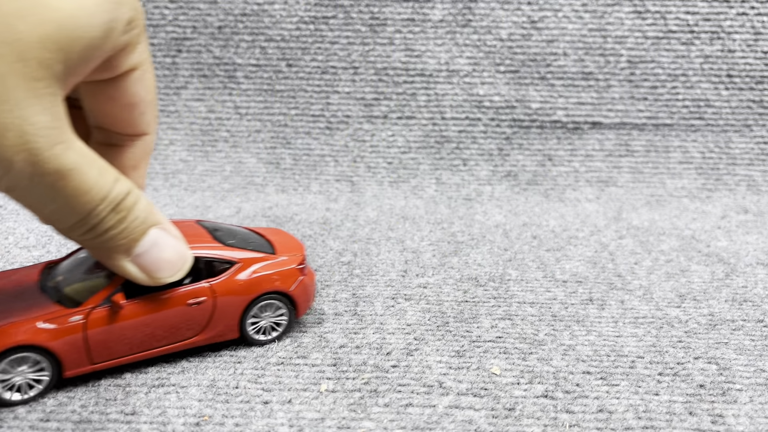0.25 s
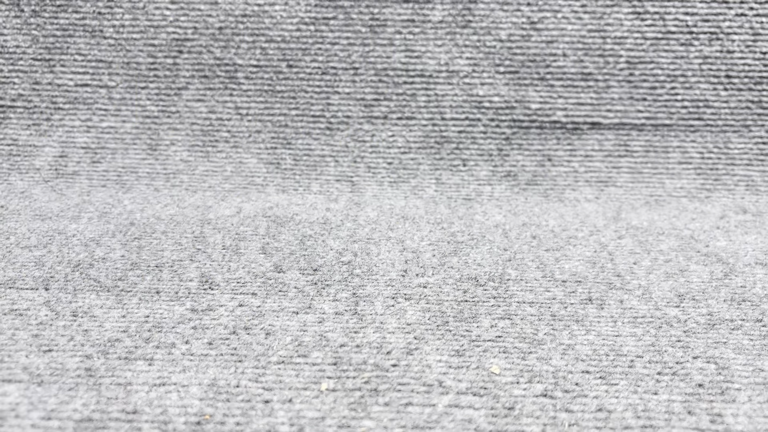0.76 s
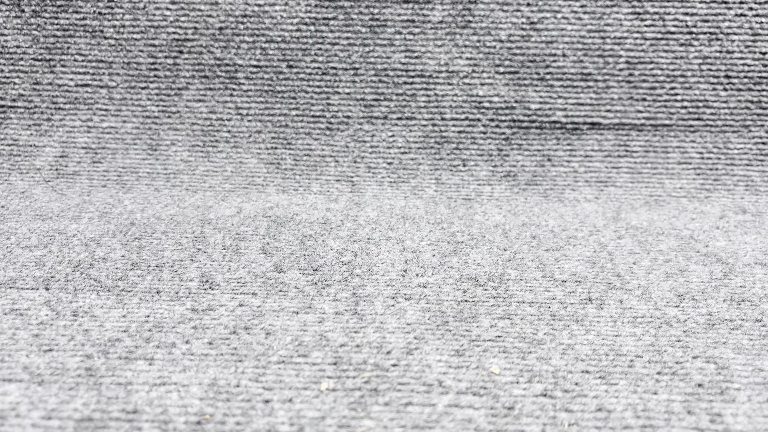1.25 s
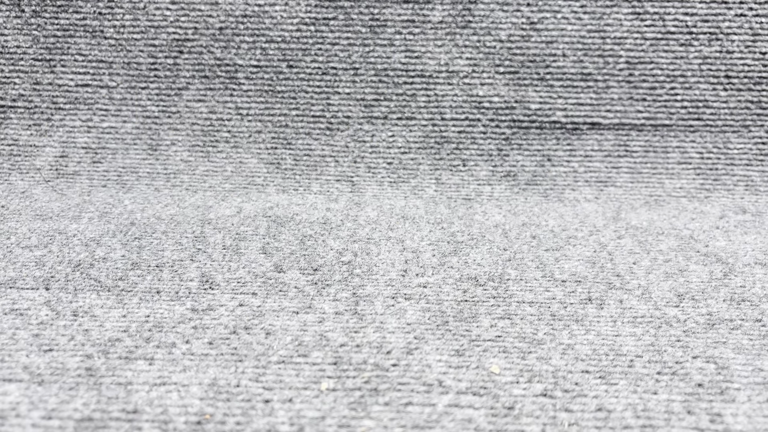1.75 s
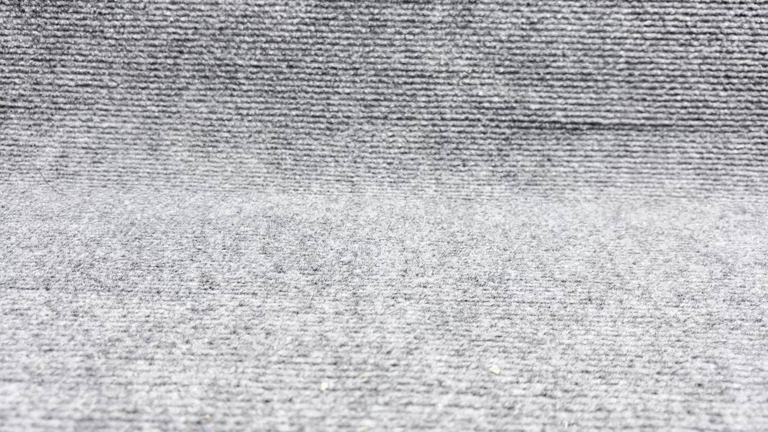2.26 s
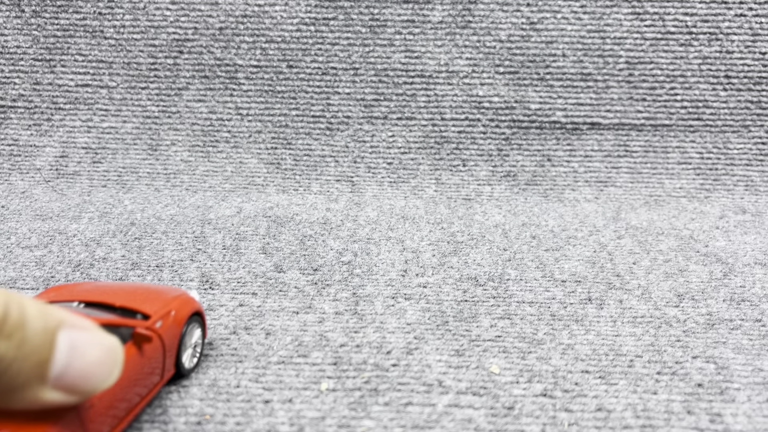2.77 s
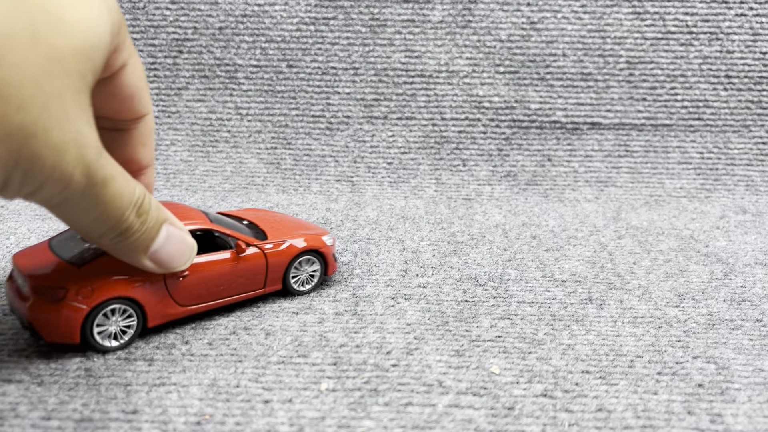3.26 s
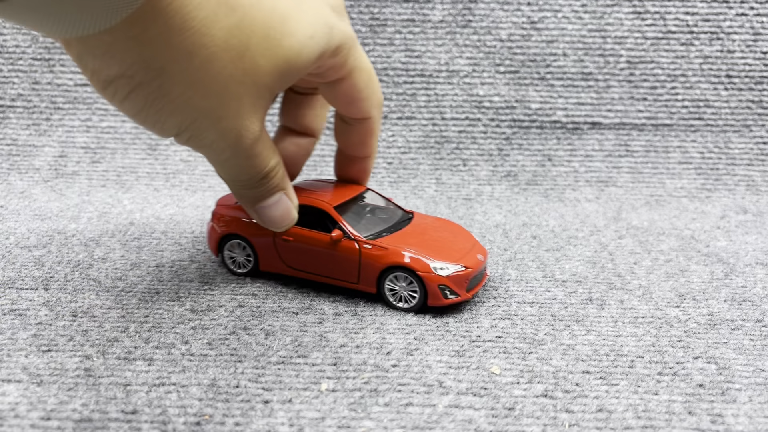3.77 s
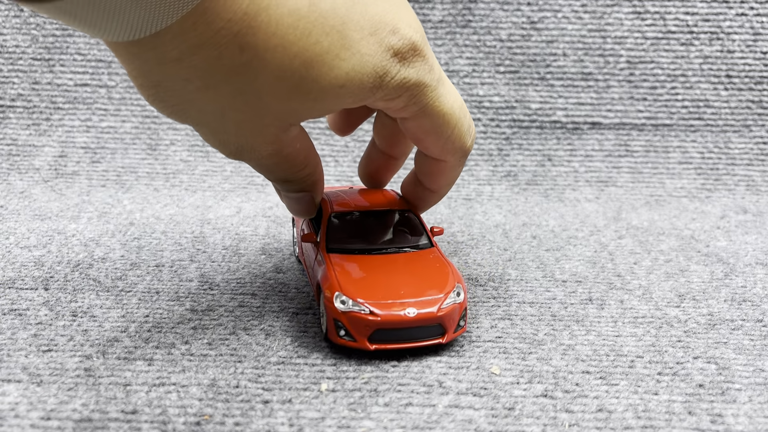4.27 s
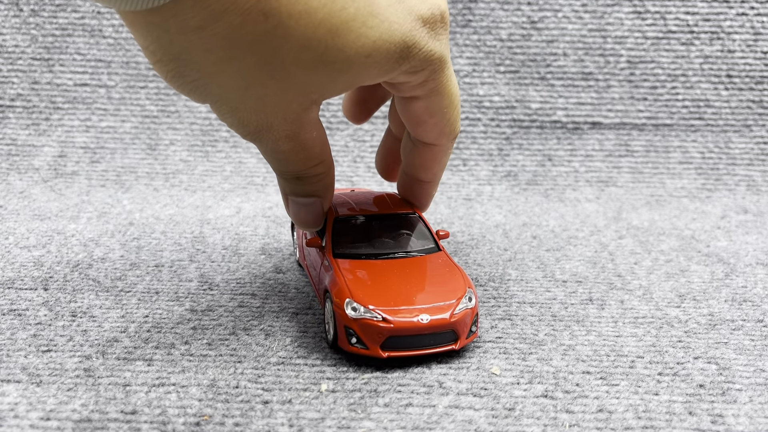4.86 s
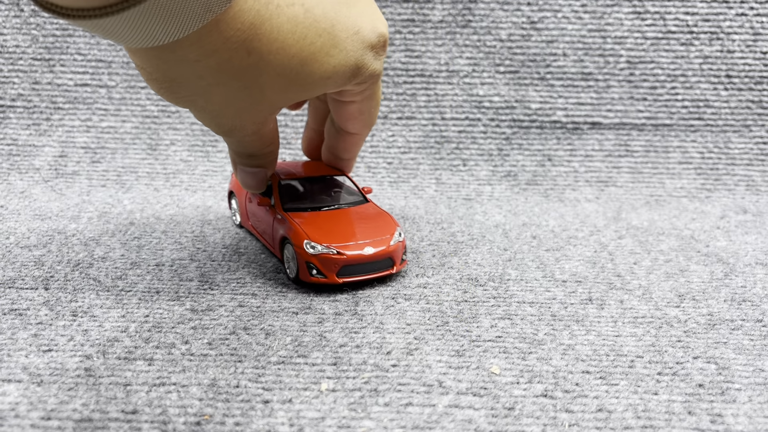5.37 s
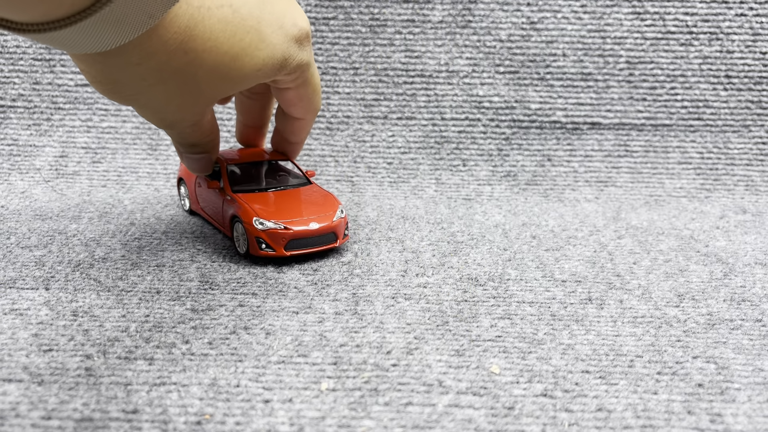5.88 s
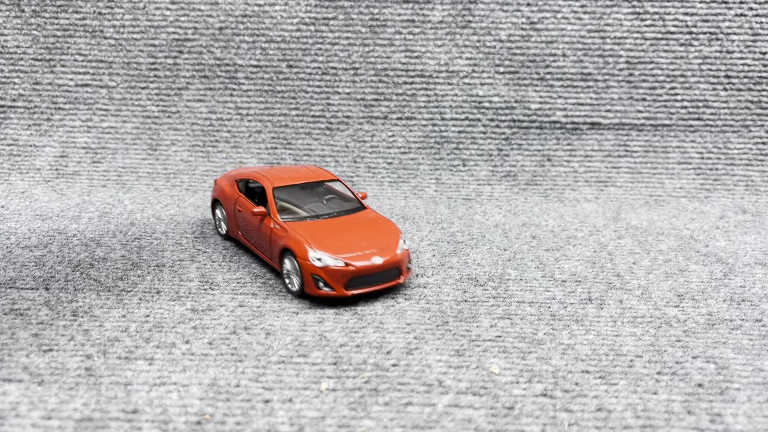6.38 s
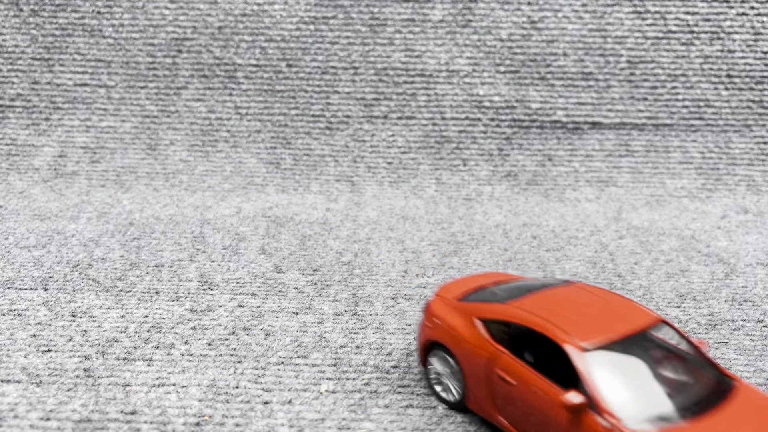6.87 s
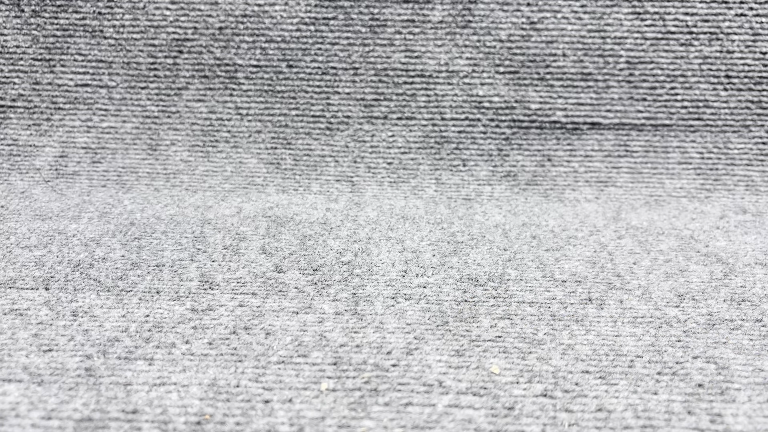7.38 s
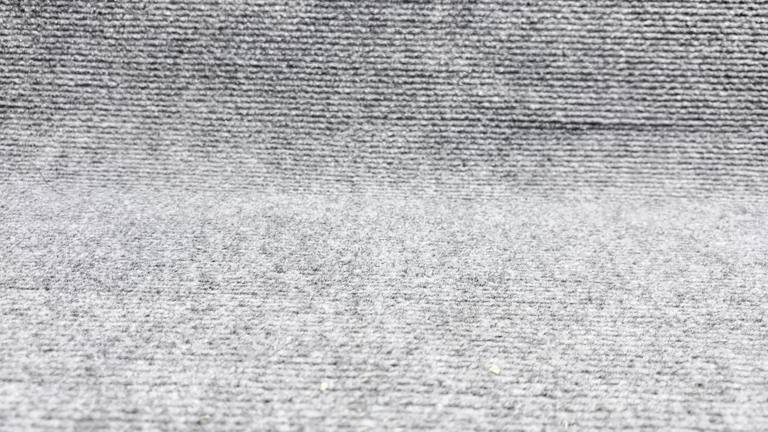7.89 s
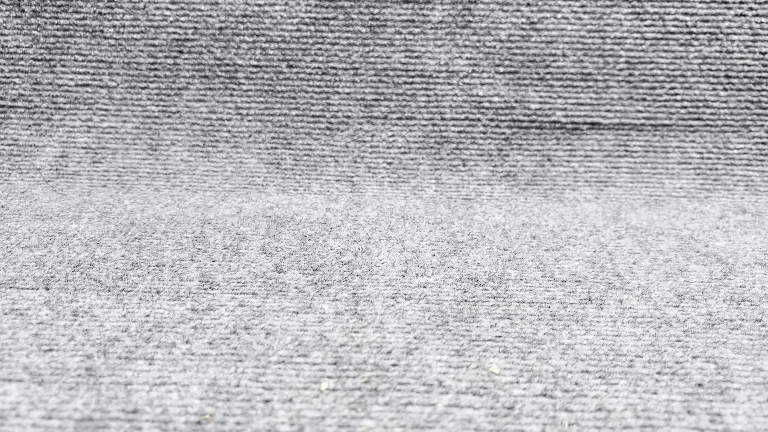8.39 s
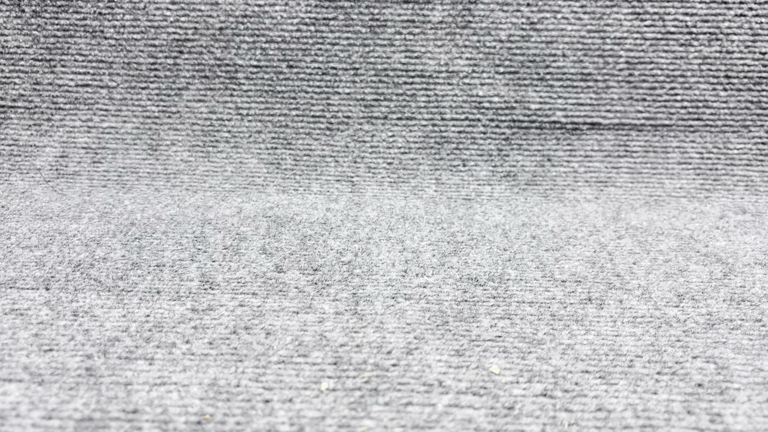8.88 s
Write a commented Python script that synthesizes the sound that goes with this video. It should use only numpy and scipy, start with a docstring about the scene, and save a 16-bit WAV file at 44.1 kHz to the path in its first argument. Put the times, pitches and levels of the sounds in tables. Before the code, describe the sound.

A small toy car is pushed and pulled over carpet by hand, its wind-up ratchet clicking in bursts with plasticky rattles, in a quiet humming room.

```python
"""Clockwork toy car on a carpet

A hand pushes and pulls a small wind-up toy car over a carpet in a quiet room, heard by two close ports.
Ratchet teeth, bumps and loose parts are noise bursts that excite damped modes of body, gearbox and pawl;
grains of rolling contact excite the same modes more softly as rustle, with a low scrape of the pile.
Knocks ring the chassis cavity, and floor boards rumble while the car bears on them.
Shaped noise gives the ventilation, steady sines with narrow noise give a wavering hum."""
import sys
import numpy as np
from scipy import signal
from scipy.fft import rfft, irfft
from scipy.io import wavfile
from scipy.ndimage import uniform_filter1d

SR = 44100
rng = np.random.default_rng(int(sys.argv[2]) if len(sys.argv) > 2 else 0)


def waveform_to_disk(signal):
    """Save audio, clipped to [-1, 1], as 16-bit WAV at the path in sys.argv[1]."""
    frames = np.transpose(np.atleast_2d(signal))
    scaled = np.clip(frames, -1, 1) * 32767
    samples = np.round(scaled).astype(np.int16)
    wavfile.write(sys.argv[1], SR, samples)


N = 403062   # samples

# Ventilation noise spectrum: [f/Hz, relative spectral level/dB]
AIR_SPECTRUM = [(25, -45), (36, -14), (50, -0.5), (117, -7), (163, -4.5), (176, -17), (200, -7.5),
                (213, -7), (257, -12), (290, -15), (310, -14.5), (450, -15.5), (600, -19.5), (880, -25),
                (1100, -32.5), (1600, -37), (2400, -42.5), (3200, -49.5), (4200, -55), (6300, -62),
                (8500, -58), (11500, -57.5), (13000, -62)]
# Share of air noise power common to both ports: [f/Hz, share/1]
AIR_LIKENESS = [(60, 1), (130, 0.95), (280, 0.67), (590, 0), (1280, 0), (2740, 0), (5900, 0.2), (12600, .9)]
# Fan tones and room resonances: [f/Hz, bandwidth/Hz, level/dB, steady-to-wavering amplitude ratio/1]
HUM_TONES = [(65.87, 1.64, -49, 2.3), (100, 2.7, -53.5, 1.5), (139.4, 21, -53.5, 0.046),
             (191.6, 11, -51.5, 1.72), (225.1, 5.6, -62, 0.073), (238.5, 11, -62.5, 0.14),
             (270.8, 20.8, -59.5, 0.16), (334.3, 14, -69.5, 0.23)]
# Phase lead of the left port over the right: [f/Hz, phase/rad]
PORT_PHASE = [(300, 0), (1400, 1), (1900, 1.09), (2700, 1.42), (3300, 1.27), (4300, 0.85), (5500, 1.1),
              (6700, -0.4), (7600, 1.7), (8870, -1), (9400, -1.9), (10400, -3.5), (11700, -6),
              (12800, -4.5)]
# Level of the left port minus the right: [f/Hz, level difference/dB]
PORT_LEVEL = [(60, 1), (110, -1.5), (200, 4), (360, 6), (650, -5), (1170, 0.5), (2120, -3.5), (3850, -1.5),
              (6970, -3.5), (12600, -7.5)]
# Rolling and handling, one list per movement: [t/s, body rustle level/dB, gear rustle level/dB]
MOVEMENTS = [
    [(0, -68.5, -62.5), (.65, -64.5, -64), (.94, -62, -61), (1.05, -59, -59), (1.15, -57.5, -54.5),
     (1.5, -68, -71), (1.9, -55.5, -59.5), (2.14, -60.5, -55.5), (2.46, -65.5, -62.5), (2.93, -64, -65.5),
     (3.12, -57, -55.5), (3.3, -62.5, -60), (3.56, -58.5, -58), (3.8, -63.5, -61.5), (3.98, -62.5, -60),
     (4.09, -58, -55), (4.19, -77, -76), (4.28, -65, -68), (4.35, -84, -83.5)],
    [(4.74, -91, -99), (4.96, -71, -89), (5.05, -58.5, -68), (5.16, -62, -53), (5.24, -59, -70),
     (5.31, -60, -66), (5.42, -54.5, -70), (5.5, -49.5, -56), (5.56, -58, -67), (5.64, -58, -58),
     (5.75, -74, -75), (6.29, -75, -78)],
    [(6.29, -71, -80), (6.55, -63.5, -71), (6.75, -49, -59), (6.89, -58, -65), (7.06, -55.5, -66),
     (7.27, -62, -62), (7.55, -71.5, -83)],
    [(7.95, -70, -82), (8.0, -57.5, -65), (8.1, -52, -53), (8.19, -60.5, -58), (8.28, -53, -46),
     (8.38, -58, -62), (8.48, -67, -76), (8.55, -60, -59), (8.64, -59.5, -58), (8.75, -58, -68),
     (8.99, -66.5, -65), (9.14, -57, -62)],
]
# Modes of each part before damping by fingers and pile: [f/Hz, relative level/dB, free t60/s]
BODY_MODES = [(1530, -10, 0.0075), (1770, -13.5, 0.013), (1906, 5, 0.017), (2055, 5, 0.029),
              (2262, 10.5, 0.0094), (2474, 4, 0.026), (2650, 1, 0.024), (2852, -0.5, 0.029),
              (3030, 0, 0.019), (3275, -12, 0.033)]
GEAR_MODES = [(3390, 4.5, 0.005), (4007, -5.5, 0.02), (4290, 3, 0.0034), (4937, -5, 0.015),
              (5207, -8, 0.015), (5790, 3, 0.0081), (5950, 7, 0.0027), (6540, -1.5, 0.012)]
PAWL_MODES = [(6960, 4.5, 0.0025), (7290, -1, 0.013), (7980, 5.5, 0.0041), (8890, -2, 0.017),
              (9420, 4.5, 0.0069), (10090, 7.5, 0.0098), (10550, 5.5, 0.0046), (11000, 5, 0.0078),
              (11900, -14, 0.01), (13800, -30, 0.0025)]
# The hand turns and cups the car, so other modes face the ports: [t/s, favoured body f/Hz,
# favoured gearbox f/Hz, level of lower gearbox modes/dB, level of highest modes/dB]
ORIENTATION = [(0.0, 2190, 4840, 5, -9), (0.35, 2560, 4100, -2, -5), (0.56, 2300, 5740, -1, 1),
               (1.55, 2140, 4260, 1, 0), (1.65, 2260, 6400, 13.5, 6), (1.78, 2100, 3670, 2, 2),
               (2.01, 2040, 4740, 3, 2), (2.37, 2800, 5080, -1, 5), (3.0, 2130, 4130, -5.5, -3),
               (3.05, 2360, 5840, 10, -8), (3.36, 2580, 4500, 0, -4), (3.59, 2360, 6560, 9.5, -3),
               (3.66, 2260, 4380, 2, -5), (3.84, 2320, 5100, -1, -2.5), (4.74, 2360, 3530, -1, -3),
               (5.42, 2580, 6750, 3, 5.5), (5.78, 2090, 3420, -8, -8), (5.9, 2300, 5000, -3, -2),
               (6.5, 2320, 3900, -9, 2), (7.13, 2040, 3620, -10, 10), (7.15, 2350, 5100, -3, -3),
               (7.53, 2200, 4900, -8, -4), (7.64, 1870, 3720, -4, 0), (8.06, 1780, 4300, 2, -1),
               (8.3, 2640, 4330, 6, -3), (8.55, 2220, 3730, 2, -1), (8.68, 2250, 4130, 1, -0.5),
               (8.86, 2240, 4300, 1, 0), (8.91, 2360, 4940, 11.5, -2), (9.04, 2340, 3440, 2, -6),
               (9.14, 2500, 5050, -4, -7)]
# Sideways place of the car, before the port differences: [t/s, left minus right level/dB]
PLACE = [(0, 7.5), (3, 7), (5.8, 7.5), (6.5, 8), (7, 3.5), (8, 4), (9.14, 3.5)]
# Ratchet, one list per hand stroke; teeth between rows fall evenly:
# [t/s, tooth count/1, body level/dB, pawl level/dB]
RATCHET_STROKES = [
    [(.0165, 0, -50.5, -51.5), (.1707, 3, -49.5, -41.5), (.3576, 7, -49.5, -49.5), (.565, 12, -48.5, -45),
     (.7266, 16, -48.5, -48.5), (.8107, 18, -48, -49), (.8899, 20, -48.5, -46), (1.0658, 25, -50, -47),
     (1.0958, 26, -50, -44.5), (1.1347, 27, -42, -46), (1.2412, 29, -54, -50), (1.3178, 30, -49.5, -47.5)],
    [(1.9472, 0, -58, -51.5), (1.9941, 1, -46.5, -42.5), (2.0988, 3, -47, -45.5), (2.1996, 5, -46.5, -43.5),
     (2.2453, 6, -48, -42.5), (2.2864, 7, -45.5, -43), (2.367, 9, -46, -40.5), (2.496, 12, -42, -42.5),
     (2.589, 14, -43.5, -41), (2.7475, 17, -42.5, -44), (2.8436, 19, -49, -45.5), (2.894, 20, -45, -45),
     (3.0968, 24, -49.5, -51), (3.1522, 25, -44.5, -42.5), (3.3032, 27, -52, -50), (3.3712, 28, -50, -46.5),
     (3.4354, 29, -48, -49), (3.4969, 30, -57, -48), (3.5686, 31, -49, -51), (3.6816, 33, -52.5, -52),
     (3.8153, 35, -53, -52.5), (3.8613, 36, -43.5, -49), (3.9358, 37, -50, -46)],
    [(5.1287, 0, -46.5, -44.5), (5.1495, 1, -42, -41.5), (5.1793, 3, -45.5, -45.5), (5.1995, 4, -46, -41),
     (5.227, 5, -43.5, -41.5), (5.283, 8, -49.5, -49), (5.302, 9, -44, -38.5), (5.329, 10, -39, -37.5),
     (5.3823, 12, -47, -45), (5.4234, 14, -57, -42), (5.4585, 15, -45, -45), (5.4752, 16, -50, -43.5),
     (5.5018, 17, -47, -46), (5.5159, 18, -41, -50), (5.538, 19, -38.5, -46)],
    [(7.1541, 0, -40, -43.5), (7.1874, 1, -52, -45.5), (7.3322, 4, -44, -49), (7.3965, 5, -45, -45),
     (7.4904, 6, -47, -47.5)],
    [(8.1028, 0, -56, -46), (8.1222, 1, -50, -41), (8.149, 2, -45, -40), (8.2546, 5, -47, -50),
     (8.2865, 6, -42.5, -43), (8.3246, 7, -46, -39), (8.3592, 8, -44, -37)],
]
# Bumps, slips and rattles outside the ratchet beat:
# [t/s, body level/dB, gearbox level/dB, pawl level/dB]
IMPACTS = [(0.2517, -55, -53, -52), (0.5092, -47, -54, -60.5), (0.595, -54, -59.5, -69),
           (0.742, -51, -51, -50), (0.7649, -38, -41, -38), (0.826, -47, -49, -62), (0.879, -62, -51, -61),
           (0.95, -52, -43.5, -58), (1.01, -55, -45, -50), (1.1263, -58, -52, -67),
           (1.2578, -41.5, -66, -53), (1.304, -55, -58, -58), (1.392, -42, -59, -60),
           (1.3978, -36, -51, -59), (1.402, -47, -50, -48), (1.486, -54, -53, -59),
           (1.4944, -31.5, -47, -52), (1.584, -45.5, -52, -41), (1.6112, -46, -63, -62),
           (1.658, -39, -42, -39), (1.6645, -30.5, -37, -29), (1.68, -35.5, -43, -45),
           (1.72, -47, -60, -56.0), (1.727, -38.5, -40, -35.5), (1.775, -43.5, -50, -53),
           (1.842, -46.5, -66, -63), (1.8582, -45, -48.5, -48), (1.8953, -37.5, -50, -63),
           (1.908, -50, -57, -56), (2.125, -56, -58, -56), (2.256, -58, -57, -56), (2.517, -47, -61, -55),
           (2.526, -46, -49, -68), (2.56, -43, -52, -50), (2.601, -45, -64, -63), (2.835, -56, -45.5, -77),
           (2.955, -39.5, -47.5, -49), (2.9867, -50, -64, -59.5), (3.0917, -47, -43.5, -37),
           (3.338, -48, -50, -44), (3.558, -50, -54, -44.5), (4.0304, -48, -64, -67),
           (4.092, -41.5, -57, -51), (4.1015, -62, -53.5, -48.5), (4.153, -48, -58, -56),
           (4.274, -51.5, -80, -76.5), (4.306, -51, -52.5, -56), (4.7287, -45.5, -73, -75),
           (4.735, -42, -60, -68), (4.965, -50, -77, -81), (5.069, -58, -62, -60),
           (5.084, -44.5, -68.5, -62), (5.096, -51, -58, -55), (5.1156, -42.5, -50, -57.5),
           (5.4298, -41, -56, -49), (5.524, -42.5, -46.5, -58), (5.553, -58, -62, -57.5),
           (5.748, -48, -59, -66), (5.779, -47.5, -59, -58.5), (5.819, -48.5, -61, -60),
           (5.832, -48, -61, -75), (5.874, -46.0, -50.5, -54), (5.901, -44.5, -46.5, -43.5),
           (5.915, -48.5, -57, -58), (6.024, -57, -77, -71), (6.04, -56.5, -76, -68),
           (6.149, -55, -67, -81), (6.296, -58.5, -87.0, -70), (6.4297, -56, -79.5, -80),
           (6.463, -43.5, -73, -79), (6.503, -47.5, -72, -77), (6.5697, -51, -67, -59),
           (6.605, -42, -55, -58), (6.6485, -35, -53, -48), (6.654, -33, -40, -41), (6.688, -45, -54, -59),
           (6.7122, -34.5, -48, -54), (6.721, -32.5, -53, -64), (6.728, -43, -52, -60),
           (6.743, -40.5, -57, -59.0), (6.787, -44, -43.5, -54), (6.797, -39, -49.5, -65),
           (6.8055, -44, -56, -70), (6.821, -42, -58.0, -65), (6.828, -48, -53, -63),
           (6.854, -51, -61, -64.5), (6.928, -34, -41, -57), (6.9493, -34, -38, -57),
           (6.9579, -26.0, -34.5, -34.5), (7.002, -41, -47, -63), (7.014, -39.5, -53, -58.0),
           (7.02, -40, -47, -62), (7.085, -46, -57, -53), (7.106, -45, -52, -59), (7.115, -42, -49, -67),
           (7.18, -41.5, -59, -56), (7.205, -47, -69, -60.0), (7.2616, -40.5, -53, -56),
           (7.4413, -49, -62, -71), (7.9447, -47, -49, -51), (7.979, -42.5, -43.5, -43),
           (7.985, -45, -53, -68), (8.019, -50, -56, -65), (8.078, -49, -57.5, -62),
           (8.201, -50.0, -53, -57), (8.2775, -43, -41, -53), (8.308, -53, -49, -52),
           (8.331, -45, -44, -42), (8.355, -41.5, -38.5, -53), (8.519, -64, -53.5, -66),
           (8.6601, -50, -47, -47), (8.6733, -27.5, -37.5, -34), (8.675, -48, -33, -31.5),
           (8.6893, -53, -43, -43), (8.704, -46, -49, -41), (8.716, -46, -45, -43), (8.786, -36, -43, -36),
           (8.7946, -60, -47, -46), (8.868, -43, -36, -29.5), (8.88, -57, -53, -43), (8.899, -52, -51, -49),
           (8.9355, -60.5, -57, -63), (9.019, -59, -57, -68), (9.0534, -61, -56, -61),
           (9.1092, -62, -51.5, -67), (9.131, -51, -53, -53)]
# Hollow knocks of the chassis: [t/s, peak level/dB, f/Hz]
CHASSIS_KNOCKS = [(3.866, -48, 1140), (5.343, -48, 960), (5.472, -42, 620), (6.928, -47, 1330),
                  (6.957, -41, 1150), (8.673, -37, 1110), (8.786, -41, 1030), (8.868, -46, 1460)]
# Floor rumble, one list per bearing of the car on the floor: [t/s, level/dB]
BEARING = [
    [(5.6, -71), (5.776, -35.5), (5.95, -62)],
    [(6.55, -54), (6.772, -38), (7.05, -58)],
    [(8.05, -65), (8.14, -38.5), (8.2, -52), (8.3, -41), (8.398, -44.5), (8.45, -69)],
    [(8.6, -45), (8.698, -38), (8.8, -61)],
]

AIR_DB = -46
ROOM_T60_S, ROOM_DB = 0.42, -18.5
CUTOFF_HZ, TOP_HZ = 13240, 11700   # upper limit of all sound; low-pass edge for air and pawl rustle
CLICK_DAMPING, RUSTLE_DAMPING = 0.8, 0.36   # factors on t60: fingers and pile shorten the ringing
SHAKE_DB, SHAKE_T60_S = -21.5, 0.27   # a bump leaves the loose parts rustling
TOOTH_SCATTER_DB = 0.85   # no two teeth strike alike
TOOTH_GEAR_DB, RATTLE_GEAR_DB = -2, 2   # gearbox level relative to pawl level
RATTLE_COUNT = 220
RATTLE_BODY_DB, RATTLE_PAWL_DB, RATTLE_SCATTER_DB = 2.5, -4.5, 0.5   # relative to the rustle of the moment
FAVOUR_DB, FAVOUR_OCTAVES = 9, 0.31   # lift near a favoured pitch and its width
GEARBOX_HZ, HIGHEST_HZ = (3350, 4980), 10400   # lower gearbox modes; start of the highest modes
REBOUND_S = (0.0016, 0.0115)   # range of delay of the second strike
REBOUND_DB, REBOUND_SCATTER_DB = -17.5, 6.5
BOARD_HZ, BOARD_T60_S = (94.6, 75, 73, 57), 0.062   # boards under each bearing
SCRAPE_HZ, SCRAPE_DB = (560, 1680), -6.5   # band; level relative to body rustle


def from_db(db):
    """Level definition: amplitude gain is 10 to the power dB/20."""
    return 10 ** (np.asarray(db) / 20)


def rms_one(x):
    """Normalisation to unit root-mean-square amplitude."""
    return x / np.sqrt(np.mean(x ** 2) + 1e-20)


def in_time(rows, outside=None):
    """Linear interpolation in time: each column becomes one value per sample."""
    s, *columns = np.transpose(rows)
    t = np.arange(N) / SR
    return [np.interp(t, s, column, outside, outside) for column in columns]


def at_hz(points, hz):
    """Interpolation of a spectrum on a log-frequency axis."""
    at, value = np.transpose(points)
    return np.interp(np.log(hz + 1), np.log(at + 1), value)


def coloured(points, channels):
    """Spectral shaping: white noise times a gain at each frequency."""
    white = rfft(rng.standard_normal((channels, N)))
    hz = np.arange(N // 2 + 1) * SR / N
    return irfft(white * from_db(at_hz(points, hz)), N)


def ring(force, hz, t60):
    """Damped resonance: a unit impulse sets a sine of initial height 1 decaying by 60 dB in t60."""
    r = from_db(-60 / (t60 * SR))
    w = 2 * np.pi * hz / SR
    return signal.lfilter([0, np.sin(w)], [1, -2 * r * np.cos(w), r * r], force + 1e-18)


def band(x, low_hz, high_hz):
    """Limited radiation: a part of the car passes only a band of frequencies."""
    edges = [low_hz, min(high_hz, .45 * SR)]
    return signal.sosfilt(signal.butter(2, edges, "band", fs=SR, output="sos"), x)


def softened(x):
    """Low-pass filtering: the noise loses its very top."""
    return signal.sosfilt(signal.cheby1(8, 1, TOP_HZ, fs=SR, output="sos"), x)


def ports(left, right):
    """Interaural-like differences: phase lead and level gap of two ports depend on frequency."""
    hz = np.arange(N // 2 + 1) * SR / N
    half = from_db(at_hz(PORT_LEVEL, hz) / 2) * np.exp(.5j * at_hz(PORT_PHASE, hz))
    return np.array([irfft(rfft(left) * half, N), irfft(rfft(right) / half, N)])


def air():
    """Partial coherence: ventilation noise mixes a field common to both ports with one of each port."""
    hz = np.arange(N // 2 + 1) * SR / N
    alike = np.clip(at_hz(AIR_LIKENESS, hz), 0, 1)
    shared, left, right = rfft(coloured(AIR_SPECTRUM, channels=3))
    shared = irfft(shared * np.sqrt(alike), N)
    own = irfft(np.array([left, right]) * np.sqrt(1 - alike), N)
    return from_db(AIR_DB) * rms_one(ports(shared, shared) + own)


def hum():
    """Narrow-band fluctuation: noise in a resonance wavers in strength beside a steady sine."""
    out, t = 0, np.arange(N) / SR
    for hz, width_hz, level_db, steady_ratio in HUM_TONES:
        t60 = 1.34 / width_hz
        noise = rng.standard_normal(N) + 0.25 * rng.standard_normal((2, N))   # mostly common to both ports
        wavering = rms_one(ring(ring(noise, hz, t60), hz, t60))
        steady = np.sqrt(2) * np.sin(2 * np.pi * (hz * t + rng.random()))
        out = out + from_db(level_db) * rms_one(steady_ratio * steady + wavering)
    return out


def car():
    """Superposition of body, gearbox and pawl, with scrape and knocks, placed by a level difference."""
    body_roll_db, gear_roll_db = rolling()
    s, body_db, gear_db, pawl_db = clicks(body_roll_db, gear_roll_db)
    fine = grit(2500, spread_db=2.0, clump_db=-2.0)
    coarse = grit(650, spread_db=1.5, clump_db=4.0)
    # a sharp pawl tick favours the higher modes, a blunt bump the lower
    body_tilt_db = np.maximum(0.72 * (pawl_db - body_db + 10.0), -1.5)
    gear_tilt_db = np.minimum(1.16 * (pawl_db - body_db), 1.5)
    # the gearbox also rattles with the body
    shaken_db = 0.78 * gear_roll_db + 0.27 * (body_roll_db - 1.0)

    body = struck(BODY_MODES, s, body_db, 0.00041, 0.00063, body_tilt_db, beam_db=2.0)
    body = body + rustle(BODY_MODES, coarse + 0.32 * fine, body_roll_db)
    gears = struck(GEAR_MODES, s, gear_db, 0.00062, 0.00078, gear_tilt_db)
    gears = gears + rustle(GEAR_MODES, fine + 0.6 * coarse, shaken_db - 9.0)
    pawl = struck(PAWL_MODES, s, pawl_db, 0.00025, 0.0023, beam_db=0.3)
    pawl = pawl + softened(rustle(PAWL_MODES, fine + .3 * coarse, gear_roll_db - 6.0, apart=0.084))

    parts = body + band(gears, 2870, 6100) + band(pawl, 5730, 17000)
    no_bass = signal.butter(4, 1400, "high", fs=SR, output="sos")   # too small to radiate bass
    small = signal.sosfilt(no_bass, parts)
    side = from_db(in_time(PLACE)[0] / 2)
    return (small + scrape(fine, body_roll_db) + knocks()) * np.array([side, 1 / side])


def rolling():
    """Energy addition: body and gear rustle levels sum the movements and the decay after each bump."""
    s, body_db, _, pawl_db = np.transpose(IMPACTS)
    jolts = np.zeros((2, N))
    jolts[:, (s * SR).astype(int)] = from_db([body_db + SHAKE_DB, pawl_db + SHAKE_DB]) ** 2
    power_decay = from_db(-120 / (SHAKE_T60_S * SR))
    shaking = signal.lfilter([1], [1, -power_decay], jolts + 1e-18)
    moving = sum(from_db(in_time(rows, outside=-120)) ** 2 for rows in MOVEMENTS)
    return 10 * np.log10(moving + shaking)


def grit(per_s, spread_db, clump_db):
    """Random impulse train: small contacts of tyres, pile and gear teeth, whose strength clumps."""
    pole = np.exp(-2 * np.pi * 40 / SR)   # clumps vary below about 40 Hz
    clumps = rms_one(signal.lfilter([1], [1, -pole], rng.standard_normal(N)))
    sizes = from_db(spread_db * np.minimum(rng.exponential(1, N), 5) + clump_db * clumps)
    return (rng.random(N) < per_s / SR) * rng.choice([-1, 1], N) * sizes


def rustle(modes, grains, roll_db, apart=0.89):
    """Modal excitation by grains, damped by the pile; wheels lying apart make the ports differ."""
    both = np.array([grains + apart * np.roll(grains, N // 3),
                     grains + apart * np.roll(grains, -N // 3)])
    rung = 0
    for k, (hz, level_db, t60) in enumerate(modes):
        gain = (-1) ** k * from_db(level_db) * facing(hz)
        rung = rung + gain * ring(both, hz, t60 * RUSTLE_DAMPING)
    return from_db(roll_db) * rms_one(rung)


def facing(hz):
    """Directivity: a mode gains level near favoured pitches, and two groups of modes shift in time."""
    s, body_hz, gear_hz, gearbox_db, highest_db = np.transpose(ORIENTATION)
    t = np.arange(0, N, 256) / SR
    near = 0
    for favoured_hz in (body_hz, gear_hz):
        octaves = np.log2(hz / np.interp(t, s, favoured_hz))
        near = near + np.exp(-(octaves / FAVOUR_OCTAVES) ** 2)
    lift_db = FAVOUR_DB * near
    if GEARBOX_HZ[0] < hz < GEARBOX_HZ[1]:
        lift_db = lift_db + np.interp(t, s, gearbox_db)
    if hz > HIGHEST_HZ:
        lift_db = lift_db + np.interp(t, s, highest_db)
    return np.interp(np.arange(N) / SR, t, from_db(lift_db))


def scrape(grains, body_roll_db):
    """Friction noise: the pile scrapes low under the tyres, following the body rustle."""
    both = np.array([grains, grains + 0.97 * np.roll(grains, N // 2)])
    return from_db(body_roll_db + SCRAPE_DB) * rms_one(band(both, *SCRAPE_HZ))


def room(x):
    """Reverberation: convolution with a short, dull, decaying noise, independent in each channel."""
    t = np.arange(int(.4 * SR)) / SR
    tail = rng.standard_normal((2, len(t))) * from_db(-60 * t / ROOM_T60_S) * (t > .002)
    tail = signal.lfilter([1], [1, -.5], tail)
    return signal.fftconvolve(x[None], tail / np.sqrt(np.sum(tail[0] ** 2)), axes=1)[:, :N]


def clicks(body_roll_db, gear_roll_db):
    """Collection of all impacts, with the excitation of each part: t, body, gearbox, pawl."""
    ratchet = with_gears(teeth(), TOOTH_GEAR_DB)
    loose = with_gears(rattles(body_roll_db, gear_roll_db), RATTLE_GEAR_DB)
    return np.concatenate([ratchet, IMPACTS, loose]).T


def teeth():
    """Ratchet action: every tooth strikes once, at a slightly random level (t/s, body/dB, pawl/dB)."""
    strokes = []
    for rows in RATCHET_STROKES:
        s, tooth, body_db, pawl_db = np.transpose(rows)
        each = np.arange(round(tooth[-1]) + 1)
        columns = [np.interp(each, np.round(tooth), c) for c in (s, body_db, pawl_db)]
        strokes.append(np.transpose(columns))
    out = np.concatenate(strokes)
    return out + TOOTH_SCATTER_DB * rng.standard_normal(out.shape) * [0, 1, 1]


def rattles(body_roll_db, gear_roll_db):
    """Random impacts: loose parts tick as strongly as the rolling is rough (t/s, body/dB, pawl/dB)."""
    at = rng.integers(0, N, RATTLE_COUNT)
    scatter = RATTLE_SCATTER_DB * rng.standard_normal((RATTLE_COUNT, 2))
    levels = np.c_[body_roll_db[at] + RATTLE_BODY_DB, gear_roll_db[at] + RATTLE_PAWL_DB]
    return np.c_[at / SR, levels + scatter]


def with_gears(rows, extra_db):
    """Coupled excitation: the gearbox level follows the pawl level at a fixed offset."""
    s, body_db, pawl_db = rows.T
    return np.c_[s, body_db, pawl_db + extra_db, pawl_db]


def contacts(count, rise_s, fall_s, late_db, late_s):
    """Rough contact: each row of force is a noise chatter, a second strike and a fading rattle."""
    t = np.arange(1500) / SR
    quick, wait, strength = rng.random((count, 3)).T[..., None]
    pace = from_db(5.5 * (quick - .5))   # each click stretches its own rise and fall
    after = np.maximum(t - REBOUND_S[0] - wait * (REBOUND_S[1] - REBOUND_S[0]), 0)
    second_gain = from_db(REBOUND_DB + REBOUND_SCATTER_DB * (2 * strength - 1.0))
    second = second_gain * (1 - np.exp(-after / rise_s)) * np.exp(-after / fall_s)
    rise = (1 - np.exp(-t / (pace * rise_s))) ** 2
    fall = np.exp(-t / (pace * fall_s)) + from_db(late_db) * np.exp(-t / late_s)
    return rng.standard_normal((count, 1500)) * (rise * fall + second)


def struck(modes, s, click_db, rise_s, fall_s, tilt_db=0, spread_db=2.6, beam_db=2.0):
    """Modal synthesis: clicks ring each mode in a new strength and direction; tilt in dB per octave."""
    force = contacts(len(s), rise_s, fall_s, late_db=-19.0, late_s=0.0075)
    start = (s * SR).astype(int)
    octaves = np.log2(np.transpose(modes)[0] / modes[0][0])
    chance = rng.standard_normal((len(s), len(modes), 2))
    strengths_db = spread_db * chance[..., 0] + np.outer(tilt_db, octaves)
    sideways_db = beam_db * chance[..., 1] * np.array([1, -1])[:, None, None]   # opposite in the two ports
    turned = np.transpose([facing(hz)[start] for hz, _, _ in modes])
    heard = turned * from_db(strengths_db + sideways_db)
    rows = 0
    for k, (hz, level_db, t60) in enumerate(modes):
        gain = (-1) ** k * from_db(level_db) * heard[..., [k]]
        rows = rows + gain * ring(force, hz, t60 * CLICK_DAMPING)
    # the click level sets the loudest short-term rms (100 samples)
    power = uniform_filter1d(np.mean(rows ** 2, axis=0), size=100, axis=1)
    loudest = np.sqrt(power.max(axis=1))
    at = start[:, None] + np.arange(1500) - 30
    out = np.zeros((2, N + 1500))
    np.add.at(out, (slice(None), np.maximum(at, 0)), rows * (from_db(click_db) / loudest)[:, None])
    return out[:, :N]


def knocks():
    """Cavity resonance: heavy bumps ring the chassis cavity through a rough, brief contact."""
    out, t = np.zeros(N), np.arange(2000) / SR
    for s, peak_db, hz in CHASSIS_KNOCKS:
        force = rng.standard_normal(2000) * np.exp(-t / 0.0012)
        rung = ring(force, hz, 0.036)
        start = int(s * SR)
        out[start:start + 2000] += from_db(peak_db) * rung / np.abs(rung).max()
    return out


def floor_rumble():
    """Resonance under random load: noise rings the floor boards while the car bears on them."""
    out = 0
    for rows, hz in zip(BEARING, BOARD_HZ):
        rung = ring(ring(rng.standard_normal(N), hz, BOARD_T60_S), hz, BOARD_T60_S)
        out = out + rms_one(rung) * from_db(in_time(rows, outside=-120)[0])
    return out


def scene():
    """Superposition of the near car, its room tail, the background and the floor."""
    near = car()
    tail = from_db(ROOM_DB) * room(near.mean(axis=0))
    return ports(*near) + tail + softened(air()) + hum() + floor_rumble()


def record(dry):
    """Band limitation: deepest bass removed, level falls above 12 kHz and stops near 13 kHz."""
    dulled = signal.sosfilt(signal.butter(3, 34, "high", fs=SR, output="sos"), dry)
    dulled = signal.sosfilt(signal.butter(6, 12600, fs=SR, output="sos"), dulled)
    return signal.sosfilt(signal.ellip(6, .5, 50, CUTOFF_HZ, fs=SR, output="sos"), dulled)


dry = scene()
out = record(dry)
waveform_to_disk(out)
```